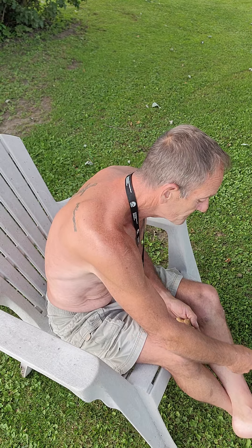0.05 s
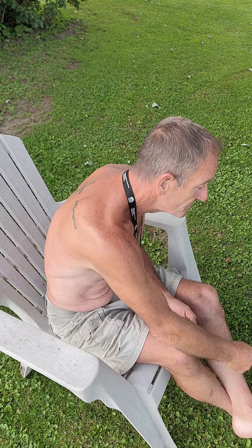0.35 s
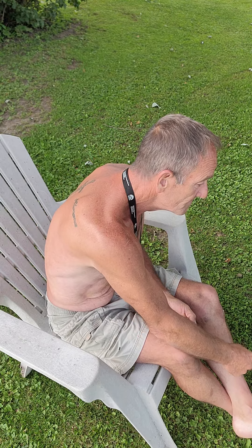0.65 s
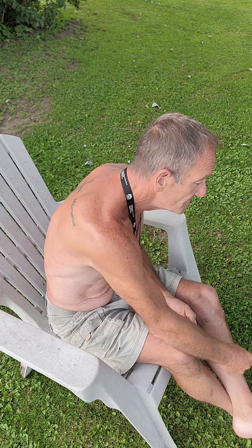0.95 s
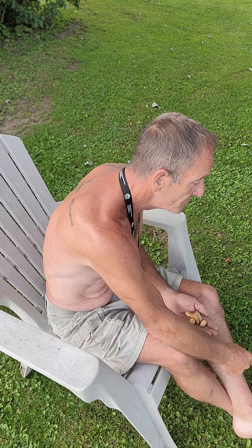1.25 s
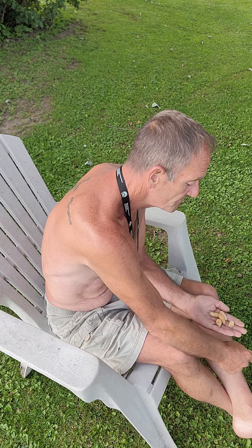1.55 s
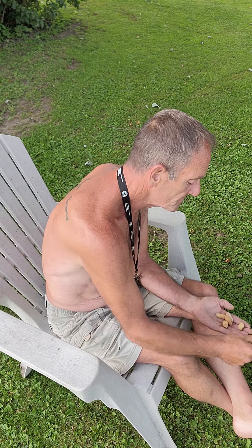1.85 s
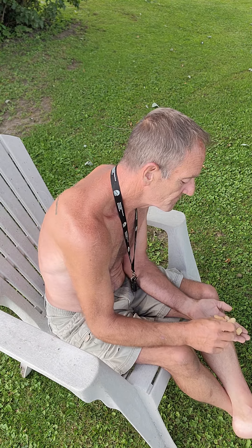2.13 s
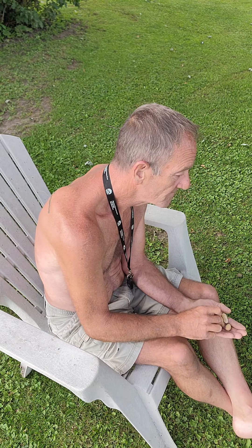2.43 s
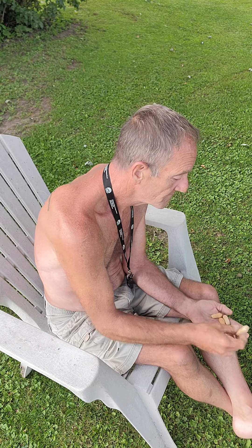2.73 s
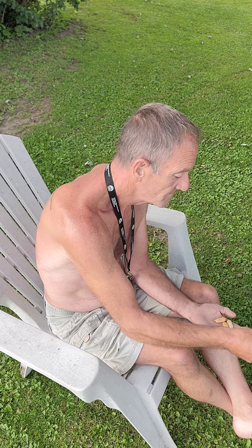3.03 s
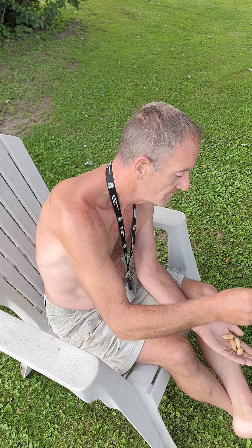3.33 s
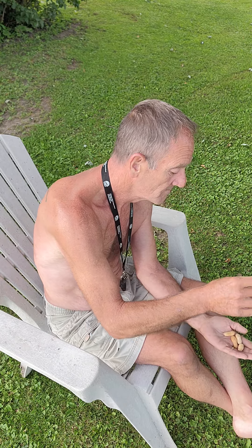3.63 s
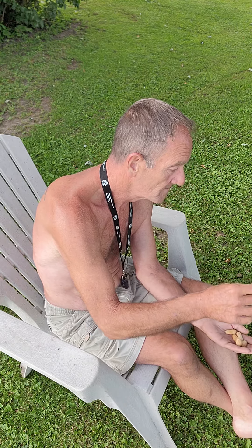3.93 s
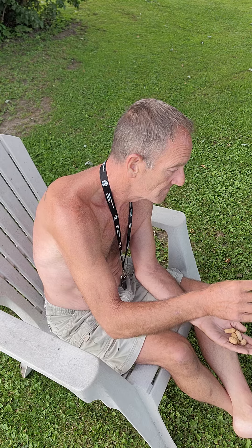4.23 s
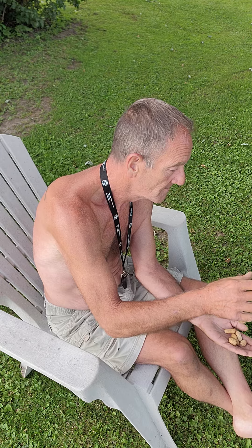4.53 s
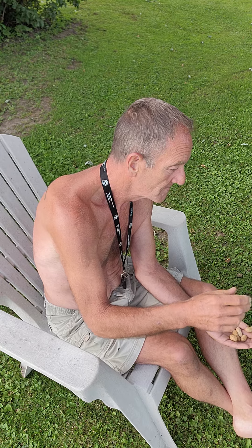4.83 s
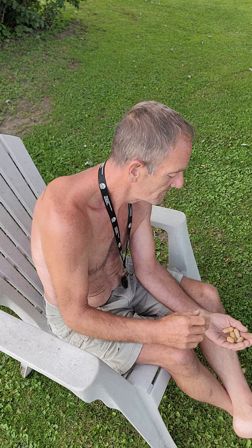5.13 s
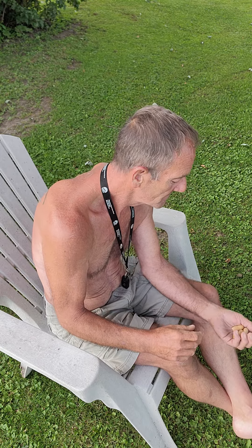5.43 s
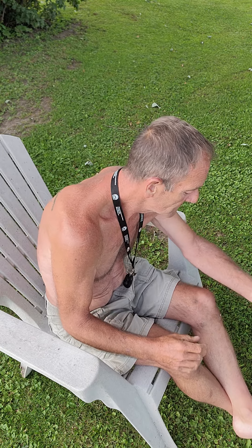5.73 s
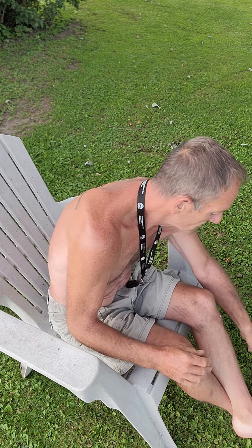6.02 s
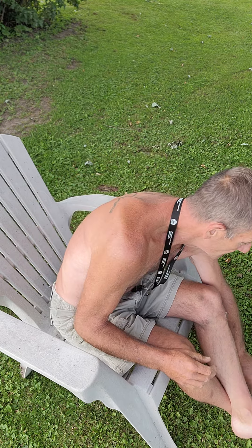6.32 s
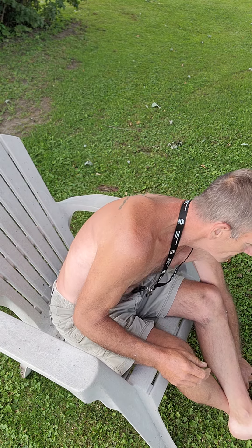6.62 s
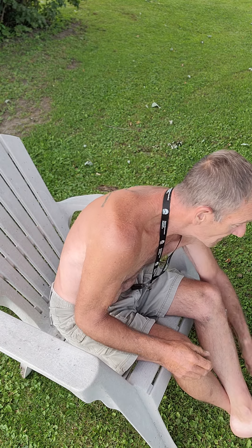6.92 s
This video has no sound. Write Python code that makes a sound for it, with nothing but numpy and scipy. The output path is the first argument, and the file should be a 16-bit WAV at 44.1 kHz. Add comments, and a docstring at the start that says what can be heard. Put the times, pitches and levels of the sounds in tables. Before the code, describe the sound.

Someone shells peanuts outdoors, about a metre from a microphone buffeted by low, uneven wind. Small dry ticks come first, then a pause, then two crisp snaps about a second apart and a softer third. Leaves hiss throughout and far birds are barely heard. As the breeze freshens, a metal clasp tinkles faintly among more shell ticks, and a plastic chair gives one soft hollow knock at the end.

```python
"""Gusts buffet a small stereo microphone, rumbling and fluttering in its ports, while leaves hiss all
round over a faint far drone. A metre away, someone on a lawn chair handles and cracks peanuts: the dry
shells tick and snap, each fracture ringing the pod as tiny fibres give way. A lanyard's metal clasp
tinkles, far birds call and chirp, and the plastic chair gives one hollow knock at the very end."""
import sys
import numpy as np
from scipy import signal
from scipy.fft import rfft, irfft
from scipy.io import wavfile
from scipy.ndimage import uniform_filter1d

SR = 44100
rng = np.random.default_rng(int(sys.argv[2]) if len(sys.argv) > 2 else 0)


def int16_out(signal):
    """Quantize to a 16-bit WAV file."""
    q = np.round(np.clip(np.atleast_2d(signal).T, -1, 1) * 32767)
    wavfile.write(sys.argv[1], SR, q.astype(np.int16))


N = 311787
TIME = np.arange(N) / SR

# The tone of large, small and finest eddies. Each row: frequency in Hz, relative level in dB.
RUMBLE_SPECTRUM = [(20, -30), (35, -18.5), (60, 2.5), (90, 3.5), (130, -2.5), (180, -14.5), (300, -38.5)]
FLUTTER_SPECTRUM = [(90, -13), (140, 0), (200, 2), (260, -6.5), (350, -13.5), (450, -28.5), (700, -51)]
FINE_SPECTRUM = [(200, -12.5), (280, 3.5), (370, -2), (450, -10.5), (560, -15), (750, -27.5), (1100, -34.5),
                 (1700, -46)]
# The breeze dies away, then freshens. Each row: time in seconds, relative level in dB,
# small eddies against large in dB, left over right in dB.
BREEZE = [(0, -42, -18, 1), (0.35, -46, -11, 0), (0.7, -42.5, -5.5, 6), (1.0, -42.5, -16, -3),
          (1.3, -46.5, -20, 1), (2.3, -51.5, -10, -0.5), (2.75, -50, 5, 6), (3.05, -62, -8.5, 3.5),
          (3.38, -56, -7.5, 0), (3.65, -47, 4.5, 7.5), (3.8, -51, 1, 2.5), (4.1, -46.5, 0.5, 4.5),
          (4.39, -48.5, -6, 2.5), (4.7, -41.5, 0, 3), (5.25, -36.5, -2, -1), (5.75, -45, 3, 3.5),
          (6.3, -40, -1, 4.5), (7.07, -44.5, 2, 5.5)]
# Gusts on the ports. Each row: start and length in seconds, relative rumble and flutter in dB,
# left over right in dB.
GUSTS = [ (0.000, 0.024, -38.5, -38, 1), (0.021, 0.12, -37, -44.5, 7), (0.19, 0.044, -42, -65, 1.5),
         (0.299, 0.02, -40.5, -53, -13), (0.541, 0.059, -39, -44.5, 4), (0.755, 0.045, -31, -37, 8),
         (0.802, 0.038, -27, -51, 5.5), (0.970, 0.019, -31.5, -36, -4), (1.047, 0.088, -37.5, -42, 5),
         (1.128, .11, -35.5, -53.5, 1), (1.339, 0.025, -39, -30, 4), (1.380, 0.051, -30, -38.5, -11),
         (1.469, 0.095, -38.5, -64, 0), (1.572, 0.083, -35.5, -50, -7), (1.793, 0.015, -32, -48.5, -8),
         (1.912, 0.054, -39, -57.5, 2), (2.037, 0.022, -40, -51.5, 6.5), (2.14, 0.032, -45, -63.5, 6),
         (2.390, 0.046, -37, -45, -5.5), (2.53, 0.051, -38.5, -51.5, 4), (2.623, 0.031, -37, -57.5, 8.5),
         (2.674, 0.035, -44.5, -56.5, 1.5), (2.793, .09, -50, -57.5, -13.5), (3.149, .018, -43.5, -44.5, 6),
         (3.184, .025, -40.5, -57, 10), (3.227, 0.011, -48, -40.5, 8.5), (3.434, .10, -40.5, -39.5, 10),
         (3.547, 0.052, -42, -34.5, 8), (3.607, .065, -37, -43, 7), (3.909, 0.034, -43, -42.5, 10.5),
         (4.002, 0.069, -42, -42, 12), (4.139, 0.052, -51.5, -40.5, 9), (4.24, 0.048, -35.5, -35, 6.5),
         (4.463, 0.049, -41.5, -28.5, 9.5), (4.615, 0.067, -39.5, -46, 0), (4.723, .035, -31.5, -44, 3.5),
         (4.793, 0.028, -51, -38.5, 2.5), (4.870, 0.082, -36.5, -44, 2), (4.972, 0.027, -29, -48, 1.5),
         (5.023, 0.026, -38, -35, -2), (5.191, 0.065, -36, -35, 1), (5.276, 0.072, -42.5, -37, -1),
         (5.471, 0.06, -29, -35.5, 0.5), (5.541, .055, -31, -32, -0.5), (5.608, 0.032, -31.5, -44, 0),
         (5.808, .03, -37.5, -35.5, 1.5), (5.917, 0.035, -31, -34, 3), (6.149, 0.026, -33.5, -36, 4),
         (6.189, 0.019, -25.5, -45, 5), (6.227, 0.025, -33, -34.5, 2), (6.312, 0.043, -46, -35, 2),
         (6.452, 0.036, -32, -46.5, 4.5), (6.551, 0.013, -22.5, -49, 4), (6.785, 0.025, -40, -46, 8.5),
         (6.846, 0.013, -47, -33.5, 5.5), (6.921, 0.039, -50, -35.5, 6.5)]
# How far the same air strikes both ports. Each row: time in seconds, share from 0 to 1.
WIND_SHARED = [(0, 0.54), (3, 0.62), (3.6, 0.69), (7.07, 0.56)]
# The tone of leaves and distant air. Each row: frequency in Hz, relative level in dB.
LEAVES_SPECTRUM = [(30, 24), (200, -3.5), (450, 4), (800, 2), (1150, -4.5), (1500, -3.5), (2200, -1.5),
                   (3000, 0.5), (7000, -0.5), (16000, 0)]
# Fader moves for the leaves and the drone. Each row: time in seconds, relative level in dB.
LEAVES_LEVEL = [(0.0, -64.5), (0.35, -65.5), (1.06, -64.5), (1.22, -64), (3.05, -63), (5.59, -64.5),
                (7.07, -63)]
DRONE_LEVEL = [(0, -69.5), (.5, -77.5), (1.1, -81), (2, -79.5), (7.07, -85)]
# Touches of the swinging clasp. Each row: start in seconds, relative level in dB.
TINKLES = [(0.048, -55), (6.054, -48), (6.168, -55), (6.248, -51)]
# The clasp's ring. Each row: frequency in Hz, relative level in dB, seconds to fall 60 dB.
CLASP_MODES = [(9100, 2.5, 0.023), (9500, 3, 0.019), (12900, 2, .015), (14650, -2, .02)]
# Shell ticks and cracks. Each row: start in seconds, relative snap level in dB, hollow's pitch in Hz,
# its relative level in dB, crumble against snap in dB, crumble decay in seconds, left over right in dB.
SNAPS = [ (0.057, -52, 3440, 0.5, 3.5, 0.0049, -6), (0.2296, -54.5, 3900, -3, 1, .005, -8),
         (0.268, -49.5, 2920, 1, -3, 0.0025, -3), (0.501, -47.5, 2350, -10, 8.5, 0.0047, -3),
         (0.65, -51, 4100, -0.5, 8.5, 0.0066, 0), (0.9513, -50.5, 4020, -2, -1, 0.0027, -6),
         (1.102, -47, 2860, -5.5, 8, 0.0036, -3), (1.1600, -61.5, 3680, 8.5, 7.5, 0.023, -4),
         (1.258, -46.5, 2630, -3, 6, 0.0093, -4), (1.422, -44, 2380, 4, 0.5, 0.0034, 1),
         (1.5807, -51, 1730, 1, 6.5, 0.0065, -2), (3.6865, -16.5, 4070, -7, -9.5, 0.0025, 0.5),
         (3.687, -31, 13400, 4, -14, 0.0027, -12), (3.695, -27, 2480, -4, -10, 0.0021, -5),
         (3.8873, -40.5, 2750, 1.5, -3, 0.0032, -10), (4.554, -23.5, 2000, -5, -12, 0.0028, 1),
         (4.5560, -36, 14800, 2, 7.5, .003, 1), (4.5551, -18.5, 4030, -13, 1, 0.0047, -3.5),
         (4.5555, -20, 5950, -4.5, -2, 0.0043, -5), (4.5576, -17.5, 8900, -8, -8.5, 0.0094, 0),
         (4.5626, -36.5, 2170, -3.5, 0, .003, 11), (5.1337, -31.5, 2920, -0.5, -19, 0.0026, -7),
         (5.1338, -36.5, 3000, 0, -4, 0.0092, 7), (5.6861, -46.5, 2340, 5.5, 1.5, .003, 1),
         (6.0522, -43.5, 3380, 9, -4, 0.0021, -8), (6.0534, -43, 3530, 4, -8, 0.0026, 0),
         (6.2474, -54.5, 3700, 2, -4, .004, -11), (6.9209, -42.5, 2770, 4.5, 3, 0.0051, 1),
         (6.9228, -40, 3940, 2, -1, 0.0022, 3)]
# A dry shell's ring. Each row: frequency in Hz, width in Hz, gain in dB.
SHELL_MODES = [(1276, 60, 10), (1903, 270, 6), (2870, 160, -7.5), (3380, 520, -2), (3710, 110, -7),
               (5240, 200, 0.5), (6060, 400, 8), (8220, 310, 12), (12900, 970, 5.5)]
# A reedy call's two syllables. Each row: start and length in seconds, top pitch in Hz, relative dB.
CALL_SYLLABLES = [(3.147, .075, 575, -54.5), (3.201, 0.0364, 600, -54)]
# The call's timbre. Each row: multiple of the pitch, relative level in dB.
CALL_PARTIALS = [(4, -27), (5, 0), (6, -5), (7, -10)]
# A far bird's chirps, mostly in pairs. Each row: start in seconds, top pitch in Hz, level in dB.
CHIRPS = [(6.170, 2240, -70), (6.190, 1850, -71), (6.283, 2230, -64.5), (6.403, 2180, -68),
          (6.433, 1870, -72), (6.594, 2160, -64.5), (6.620, 1830, -71)]
# The plastic chair's ring. Each row: frequency in Hz, level in dB, seconds to fall 60 dB.
CHAIR_MODES = [(1190, -48.5, 0.027), (1535, -47.5, 0.075)]
# The colour of the microphone ports. Each row: frequency in Hz, left gain in dB, right gain in dB.
PORT_EQ = [(1000, 0, -0.5), (2310, 1, 1.5), (2860, 4, 4), (4310, 2, 7), (4430, 3.5, 2.5), (5390, 3, -1.5),
           (6180, -1.5, -16), (7070, -1, -10.5), (7890, -6.5, -13), (8270, -14.5, -30), (10700, -14.5, -23),
           (11500, -21.5, -17.5), (12500, -18.5, -18), (15500, -20.5, -15.5)]


def from_db(db):
    """Decibels to gain."""
    return 10 ** (np.asarray(db) / 20)


def rms_one(x):
    """Scale to rms 1."""
    return x / np.sqrt(np.mean(x ** 2) + 1e-20)


def in_time(rows):
    """The columns of a curve at every sample."""
    times, *columns = np.transpose(rows)
    return [np.interp(TIME, times, column) for column in columns]


def panned(side_db):
    """Left and right gains for a level difference."""
    return from_db(np.array([[.5], [-.5]]) * side_db)


def drift(rate_hz, hop=40):
    """A smooth random wander of rms about 1."""
    pole = np.exp(-2 * np.pi * rate_hz * hop / SR)
    noise = rng.standard_normal(N // hop + 2002)
    slow = signal.lfilter([1], [1, -2 * pole, pole * pole], noise)[2000:]
    return np.interp(np.arange(N) / hop, np.arange(len(slow)), rms_one(slow))


def colour(x, spectrum, size=8192):
    """Minimum-phase EQ through (Hz, dB) points."""
    hz, level_db = np.transpose(spectrum)
    grid = np.maximum(np.arange(size // 2 + 1) * SR / size, 1)
    gain = from_db(np.interp(np.log(grid), np.log(hz), level_db))
    cepstrum = irfft(np.log(gain))
    cepstrum[1:size // 2] *= 2
    cepstrum[size // 2 + 1:] = 0
    impulse = irfft(np.exp(rfft(cepstrum)))
    return np.apply_along_axis(signal.fftconvolve, -1, x, impulse)[..., :x.shape[-1]]


def cut(x, hz, kind, order=2):
    """Butterworth high- or low-pass."""
    return signal.sosfilt(signal.butter(order, hz, kind, fs=SR, output="sos"), x)


def resonance(x, hz, width_hz):
    """A resonance of gain 1 at its peak."""
    r = np.exp(-np.pi * width_hz / SR)
    poles = [1, -2 * r * np.cos(2 * np.pi * hz / SR), r * r]
    return signal.lfilter(np.array([1, 0, -1]) * (1 - r * r) / 2, poles, x + 1e-18)


def struck(start_s, modes, size=8000):
    """Modes that ring out from one touch."""
    at, t = round(start_s * SR), np.arange(size) / SR
    out = np.zeros(N + size)
    for hz, db, t60 in modes:
        out[at:at + size] += from_db(db) * np.exp(-np.log(1000) * t / t60) * np.sin(2 * np.pi * hz * t)
    return out[:N]


def airflow(attack_s=0.008, release_s=0.014, fitful_db=4.5, steady_above_db=-42, fitful_below_db=-52):
    """Gusts add power to the breeze and pull it to their side; gives rumble, flutter and pan in dB."""
    breeze_db, small_db, breeze_side_db = in_time(BREEZE)
    lightness = np.clip((steady_above_db - breeze_db) / (steady_above_db - fitful_below_db), 0, 1)
    breeze_db += lightness * fitful_db * (drift(rate_hz=14) - .5)   # light air comes in fits and starts
    large, small = from_db(breeze_db) ** 2, from_db(breeze_db + small_db) ** 2
    side = (large + small) * breeze_side_db
    for start_s, length_s, rumble_db, flutter_db, side_db in GUSTS:
        span = slice(int(start_s * SR), int((start_s + length_s) * SR) + SR // 4)
        t = TIME[span] - start_s
        envelope = np.clip(t / attack_s, 0, 1) * np.exp(-np.maximum(t - length_s, 0) / release_s)
        rumble, flutter = (envelope * from_db(rumble_db)) ** 2, (envelope * from_db(flutter_db)) ** 2
        large[span] += rumble
        small[span] += flutter
        side[span] += (rumble + flutter) * side_db
    return 10 * np.log10(large), 10 * np.log10(small), side / (large + small)


def eddies(spectrum, side_db, lump_db, lump_hz):
    """Lumpy turbulence, partly shared and partly each port's own."""
    shared = in_time(WIND_SHARED)[0]
    white = np.sqrt(1 - shared) * rng.standard_normal((2, N)) + np.sqrt(shared) * rng.standard_normal(N)
    flow = colour(white, spectrum) * panned(side_db)
    slow_power = uniform_filter1d(uniform_filter1d(flow.mean(0) ** 2, size=1500), size=600)
    flow /= np.sqrt(slow_power + 1e-12)   # ride out the noise's own swells
    return rms_one(flow * from_db(lump_db * drift(lump_hz)))


def wind(stir=0.86, stir_above_db=-40, follow=0.9, veer_db=1.5):
    """Buffets rumble and flutter; the longer and faster air flows, the more breaks into fine eddies."""
    rumble_db, flutter_db, side_db = airflow()
    side_db += veer_db * drift(rate_hz=5)
    sustained_db = uniform_filter1d(flutter_db, size=16000)
    fine_db = sustained_db + follow * (flutter_db - sustained_db) + stir * (sustained_db - stir_above_db)
    rumble = from_db(rumble_db + 1) * eddies(RUMBLE_SPECTRUM, side_db, lump_db=2, lump_hz=34)
    flutter = from_db(flutter_db - 0.3) * eddies(FLUTTER_SPECTRUM, side_db, lump_db=3, lump_hz=40.5)
    fine = from_db(fine_db - 6) * eddies(FINE_SPECTRUM, side_db, lump_db=3.5, lump_hz=50)
    buffeting = cut(rumble, 350, "low") + cut(flutter, 530, "low", order=4) + cut(fine, 1500, "low")
    return cut(buffeting, 31, "high")


def leaves(tree_share=0.39, flicker_db=0.47, port_lag_s=0.000352):
    """Smooth hiss from all round; part comes from trees to the left and reaches that port first."""
    trees = cut(rng.standard_normal(N), 5000, "low", order=1)
    trees = np.array([trees, np.roll(trees, round(port_lag_s * SR))])
    air = np.sqrt(1 - tree_share) * rng.standard_normal((2, N)) + np.sqrt(tree_share) * trees
    level_db = in_time(LEAVES_LEVEL)[0] + 7.5 + flicker_db * drift(rate_hz=12)
    return from_db(level_db) * rms_one(colour(air, LEAVES_SPECTRUM))


def drone(hz=1080, width_hz=480):
    """A narrow band of far-off rushing that fades."""
    band = resonance(resonance(rng.standard_normal(N), hz, width_hz), hz, width_hz)
    return from_db(in_time(DRONE_LEVEL)[0]) * rms_one(band)


def clasp(vary_db=4):
    """Faint, very high rings of a small metal clasp; each touch favours different modes."""
    out = np.zeros(N)
    for start_s, touch_db in TINKLES:
        modes = [(hz, touch_db + db + rng.normal(0, vary_db), t60) for hz, db, t60 in CLASP_MODES]
        out += struck(start_s, modes)
    return out


def fracture(hollow_hz, hollow_db, crumble_db, crumble_s, hollow_q=6, fibres_per_s=5000, size=3000):
    """One snap, then tiny fibres giving way; the pod's hollow rings along for a few cycles."""
    t = np.arange(size) / SR
    fibres = rng.standard_normal((2, size)) * (rng.random(size) < fibres_per_s / SR)
    fibres *= np.exp(-t / crumble_s)
    force = from_db(crumble_db) * fibres / np.sqrt(np.sum(fibres ** 2) / 2 + 1e-12)
    force[:, 0] += 1   # the snap itself
    return force + from_db(hollow_db + 15.5) * resonance(force, hollow_hz, hollow_hz / hollow_q)


def peanuts(bend_hz=3400, bend_width_hz=2200, left_lag_s=.00008):
    """Every fracture sounds the shell's modes; so small a body radiates no bass."""
    force = np.zeros((2, N))
    for start_s, snap_db, hollow_hz, hollow_db, crumble_db, crumble_s, side_db in SNAPS:
        at = round(start_s * SR)
        snap = from_db(snap_db) * panned(side_db) * fracture(hollow_hz, hollow_db, crumble_db, crumble_s)
        force[:, at:at + snap.shape[1]] += snap[:, :N - at]
    shell = force + sum(from_db(db) * resonance(force, hz, width) for hz, width, db in SHELL_MODES)
    # An all-pass: bending waves smear each snap over a few cycles.
    shell -= 2 * resonance(shell, bend_hz, bend_width_hz)
    left, right = from_db(4) * cut(shell, 810, "high", order=6)
    return np.array([np.roll(left, round(left_lag_s * SR)), right])   # hands nearer the right port


def birds(chirp_s=0.037, chirp_arch=.08, call_arch=.25, waver=0.0128):
    """One reedy call of upper partials, then thin chirps; every note swells and arches in pitch."""
    out = np.zeros(N)
    unsteady = 1 + waver * drift(rate_hz=155)
    for start_s, length_s, hz, db in CALL_SYLLABLES:
        swell = np.sin(np.pi * np.clip((TIME - start_s) / length_s, 0, 1))
        phase = 2 * np.pi * np.cumsum(hz * unsteady * (1 + call_arch * (swell - 1))) / SR
        reedy = sum(from_db(partial_db) * np.sin(k * phase) for k, partial_db in CALL_PARTIALS)
        out += from_db(db - 3.5) * swell * reedy
    for start_s, hz, db in CHIRPS:
        swell = np.sin(np.pi * np.clip((TIME - start_s) / chirp_s, 0, 1))
        phase = 2 * np.pi * np.cumsum(hz * (1 + chirp_arch * (swell - 1))) / SR
        out += from_db(db) * swell ** 2 * np.sin(phase)
    return out


def chair_knock(start_s=7.047):
    """One knock rings two short modes of hollow plastic."""
    return struck(start_s, CHAIR_MODES)


def garden(x, near_db=-16, near_t60=0.12, far_db=-20, far_t60=0.2, predelay_s=.002, size=16384):
    """Chair, body and lawn scatter a short tail; bushes add a fainter, longer one."""
    t = np.arange(size) / SR
    tail = 0
    for level_db, t60 in (near_db, near_t60), (far_db, far_t60):
        scatter = rng.standard_normal((2, size)) * np.exp(-np.log(1000) * t / t60) * (t > predelay_s)
        tail += from_db(level_db) * rms_one(scatter) / np.sqrt(size)
    return x + signal.fftconvolve(x, tail, axes=1)[:, :N]


def scene():
    """Near clicks and far birds in the open air, under a bed of hiss and wind."""
    return garden(peanuts() + chair_knock() + clasp() + birds()) + leaves() + drone() + wind()


def record(dry, cutoff_hz=15900):
    """Each port colours the sound in its own way; a steep low-pass takes off the top."""
    hz, left_db, right_db = np.transpose(PORT_EQ)
    heard = np.array([colour(x, np.column_stack([hz, db])) for x, db in zip(dry, (left_db, right_db))])
    return signal.sosfilt(signal.ellip(10, .2, 80, cutoff_hz, fs=SR, output="sos"), heard)


dry = scene()
out = record(dry)
int16_out(out)
```